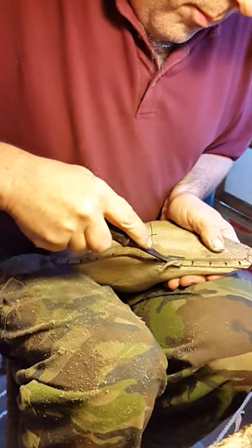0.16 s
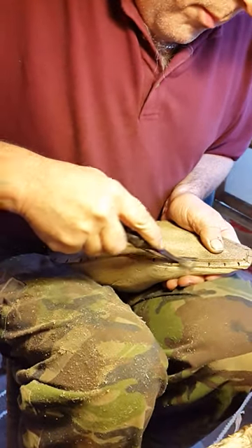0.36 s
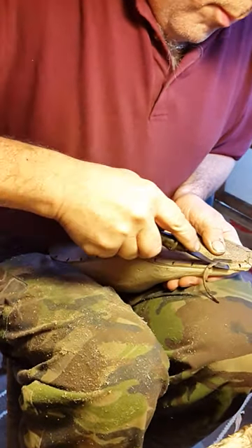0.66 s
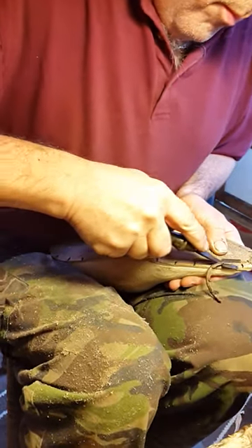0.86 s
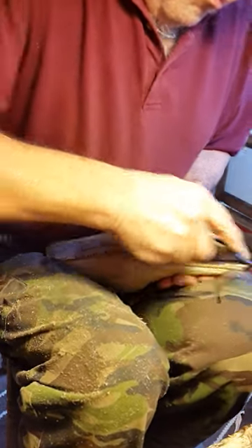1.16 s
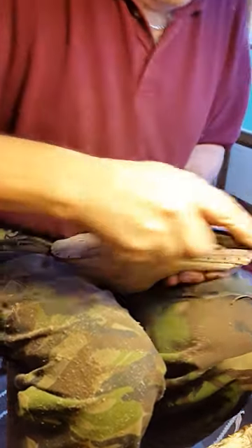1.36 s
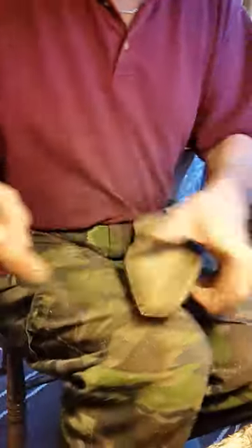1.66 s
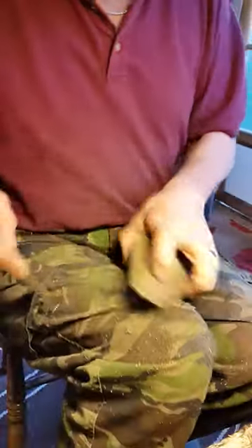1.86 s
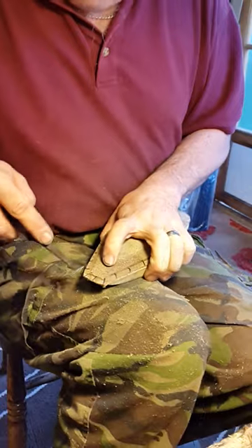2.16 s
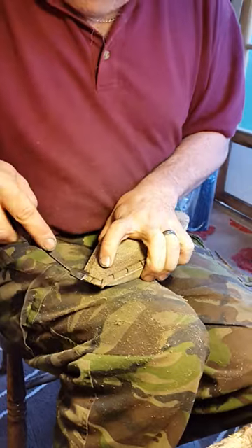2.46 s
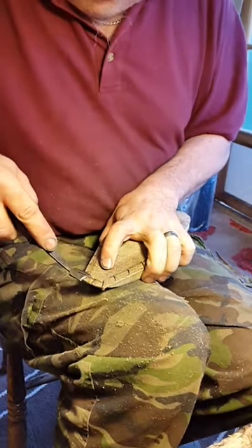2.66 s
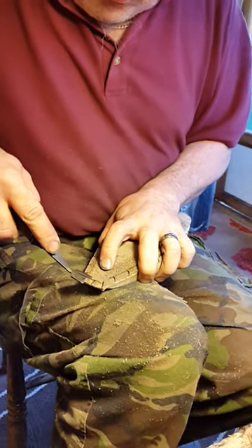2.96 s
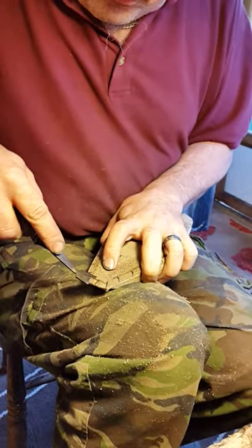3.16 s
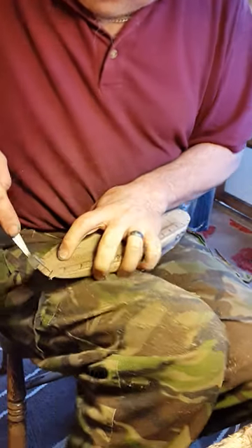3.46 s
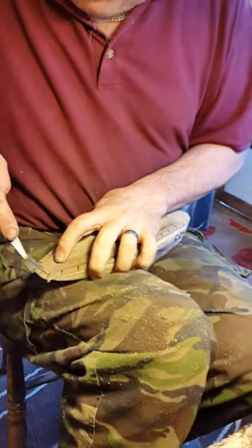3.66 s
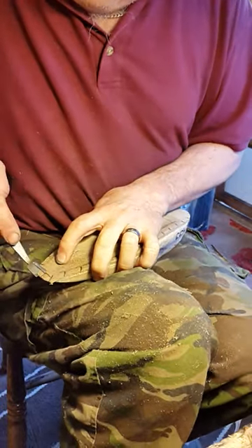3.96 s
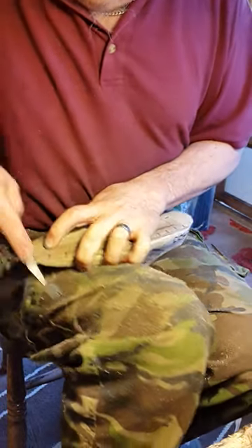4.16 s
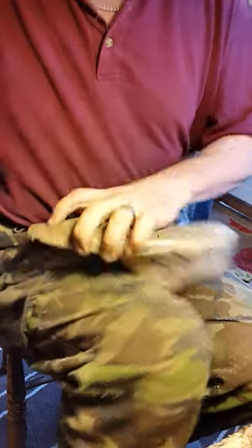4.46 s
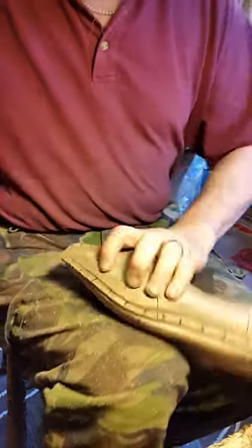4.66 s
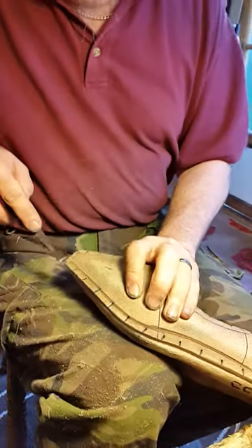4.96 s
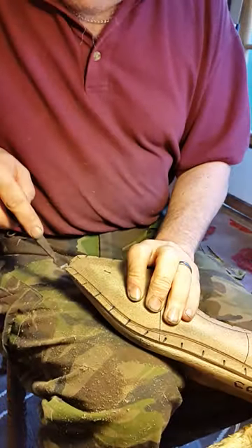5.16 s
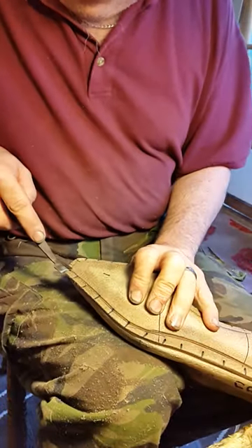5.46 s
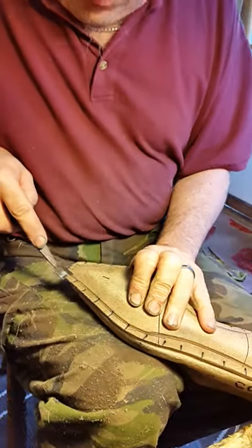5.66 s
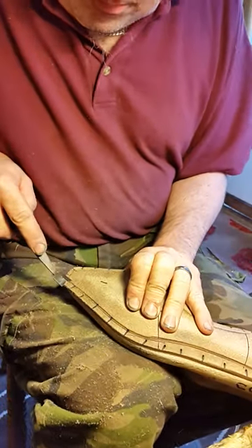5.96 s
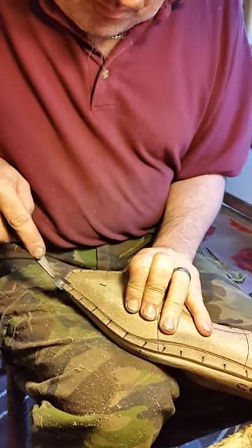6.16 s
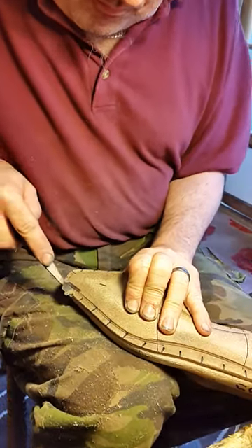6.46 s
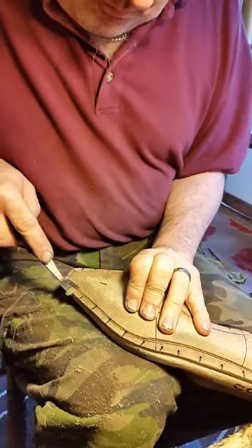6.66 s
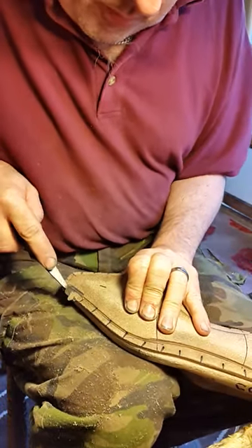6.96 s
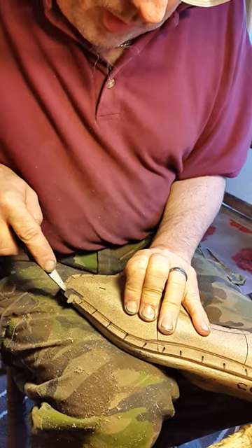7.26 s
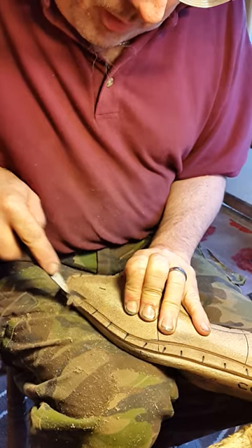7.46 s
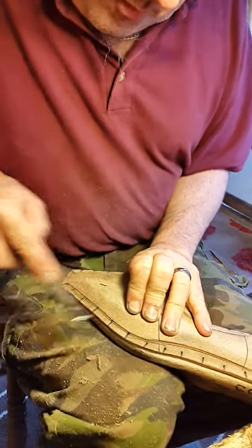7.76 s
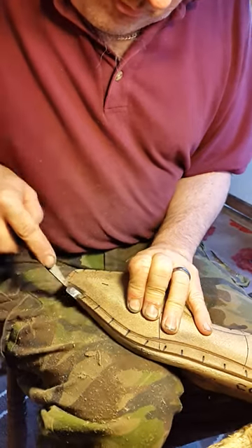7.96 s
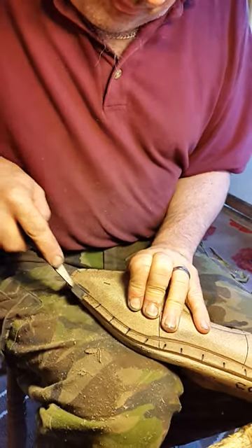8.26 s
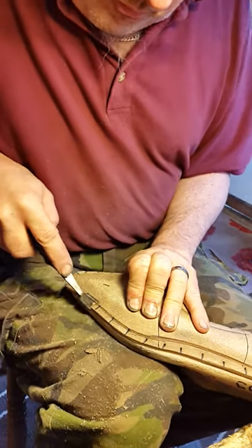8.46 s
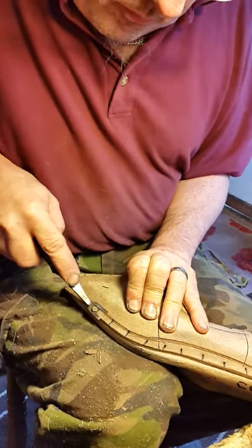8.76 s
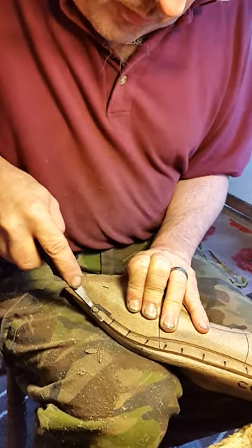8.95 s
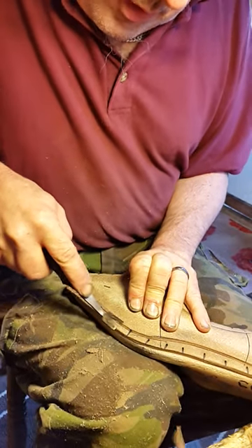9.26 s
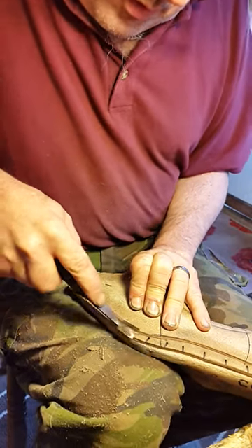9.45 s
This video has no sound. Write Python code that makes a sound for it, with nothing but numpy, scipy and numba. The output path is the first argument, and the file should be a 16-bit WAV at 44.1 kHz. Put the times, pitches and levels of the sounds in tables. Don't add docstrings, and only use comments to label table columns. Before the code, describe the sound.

A quiet room hums low with faint hiss. From 0.1 to 1.3 seconds a knife makes about ten short, light scrapes in leather, each a grainy rasp with a hollow wooden ring near the middle pitches, strongest around 0.55 to 1.25. Cloth and skin rustle from 1.3 to 2.2 with dull small bumps. After near silence, tiny nicks come at 3.0 to 3.3, rustle at 3.4 to 4, and a cluster of crisp nicks at 4 to 4.3. Brisk rustling leads to one loud, deep, dry knock at 5.0; the room noise dips, then recovers. From 6.0 heavier cuts judder and creak woodily, densest at 6.4 to 7.1, with a strong stroke at 7.6 and a bright snap. A softer pause with cloth sliding follows, then resonant strokes at 8.4 to 9.6, lower and fuller. Close stereo pickup, short dull echo.

```python
import sys
import numpy as np
from scipy import signal
from scipy.fft import rfft, irfft, next_fast_len
from scipy.io import wavfile
from scipy.ndimage import uniform_filter1d
from numba import njit

SR = 44100
rng = np.random.default_rng(int(sys.argv[2]) if len(sys.argv) > 2 else 0)


def file_out(sig):
    cols = np.atleast_2d(sig).T
    lim = np.clip(cols, -1, 1)
    pcm = np.round(lim * 32767).astype(np.int16)
    wavfile.write(sys.argv[1], SR, pcm)


def undo_db(level):
    steps = np.asarray(level, float) / 20
    return 10 ** steps


N = 424241
HZ = np.maximum(np.fft.rfftfreq(N, 1 / SR), 1)


def rms_one(x):
    return x / np.sqrt(np.mean(x ** 2) + 1e-20)


def at_hz(points):
    hz, value = np.transpose(points)
    return np.interp(np.log(HZ), np.log(np.maximum(hz, 30)), value)


def colour(x, spectrum):
    return rms_one(irfft(rfft(x) * undo_db(at_hz(spectrum)), N))


def sos_filter(x, order, hz, kind):
    return signal.sosfilt(signal.butter(order, hz, kind, fs=SR, output="sos"), x)


def drift(rate):
    r = np.exp(-2 * np.pi * rate / SR)
    wander = signal.lfilter([1], [1, -2 * r, r * r], rng.standard_normal(N + SR))
    return rms_one(wander[SR:])


def grains(per_s, spread_db, clump_db):
    born = rng.random(N) < per_s / SR
    size_db = spread_db * np.minimum(rng.exponential(1, N), 4) + clump_db * drift(34)
    return rms_one(born * undo_db(size_db) * rng.choice([-1, 1], N))


def landings(rows):
    s, peak_db = np.transpose(rows)
    out = np.zeros(N)
    out[np.round(s * SR).astype(int)] = undo_db(peak_db)
    return out


# time in seconds, wood pitch ratio, blade pitch ratio.
FLEX = [(0.2, 0.95, 1.01), (0.55, 0.98, .99), (0.77, 0.97, 1.02), (1.0, 1.003, .98), (1.27, .99, 1.01),
        (3.5, 1, .99), (4.25, 1.01, 1.01), (6.1, 0.98, .99), (6.45, 1.04, 1.01), (6.85, 1.013, .99),
        (7.1, .99, 1.01), (7.65, 1.01, 0.983), (8.5, 1, 1.1), (8.72, 1.01, 1.01), (8.93, 1.04, 1.01),
        (9.23, 1, .99), (9.55, 0.99, 1.01)]


def flex(column):
    points = np.array(FLEX)
    return np.interp(np.arange(N) / SR, points[:, 0], points[:, column])


@njit
def ring_twice(x, turn, r, ratio):
    out, g = np.zeros_like(x), (1 - r * r) / 2
    for ch in range(x.shape[0]):
        v1 = v2 = c = 0.
        for i in range(2, x.shape[1]):
            if i % 64 == 2:
                c = 2 * r * np.cos(turn * ratio[i])
            v = g * (x[ch, i] - x[ch, i - 2]) + c * v1 - r * r * v2 + 1e-18
            out[ch, i] = g * (v - v2) + c * out[ch, i - 1] - r * r * out[ch, i - 2] + 1e-18
            v1, v2 = v, v1
    return out


def resonate(x, modes, ratio=None):
    out = 0
    ratio = flex(1) if ratio is None else ratio
    for k, (hz, width, level_db) in enumerate(modes):
        r = np.exp(-np.pi * width * 1.55 / SR)
        ringing = ring_twice(np.atleast_2d(x), 2 * np.pi * hz / SR, r, ratio)
        out = out + (-1) ** k * undo_db(level_db) * ringing
    return out.reshape(np.shape(x))


def body(force, modes, per_s, spread_db, clump_db):
    slips = grains(per_s, spread_db, clump_db)
    swell = uniform_filter1d(rms_one(resonate(slips, modes)) ** 2, size=1500)
    slips = slips / (swell + 0.091) ** 0.42
    return resonate(force * slips, modes) / np.std(resonate(slips, modes))


# frequency in Hz, left lead in radians.
HAND_PAN = [(60, -8), (110, -7), (200, -10.5), (380, -11), (700, -1.5), (1290, -8), (2380, 14.5),
            (4400, -5.5), (8120, 16), (15000, 20)]
HAND_TURN = [(0, -7.5), (690, 1.38), (1030, 4), (1980, 4.5), (3900, 14), (16000, 23.5)]
KNEE_PAN = [(60, -16), (110, -4.5), (200, -3), (380, -7), (700, -2.5), (1290, -7), (2380, 14.5), (4400, -4),
            (8120, 11.5), (15000, 16)]
KNEE_TURN = [(0, -0.5), (430, 1.5), (780, 1.46), (1120, 9.5), (1720, 12.5), (2760, 18), (3620, 9.5),
             (4310, 12), (5080, 5.5), (6980, 18), (7920, 8), (8270, 4), (11100, 12), (15700, 8.5)]
KNOCK_PAN = [(100, 1.5), (380, -6), (1290, -5), (2400, 3.5), (8000, 3.5)]
KNOCK_TURN = [(0, 0.51), (520, 0.45), (1380, 3.46), (8000, 17)]


def ports(x, pan, turn):
    half = undo_db(at_hz(pan) / 2) * np.exp(.5j * np.interp(HZ, *np.transpose(turn)))
    pair = irfft(rfft(x) * np.array([half, 1 / half]), N)
    return pair * np.minimum(np.arange(N) / 800, 1)


# time in seconds, level in dB.
ROOM_NOISE = [
    (0, -59),
    (1.5, -59),
    (3, -63.5),
    (4.979, -59.5),
    (5.049, -62.5),
    (5.599, -66.5),
    (6.2, -61),
    (7.4, -60.5),
    (8.2, -61),
    (9.62, -55),
]
# frequency in Hz, level in dB per Hz.
AIR = [(12, -44.5), (20, -8.5), (43, -12), (81, -2), (209, -4), (285, -8), (387, -7), (498, -17.5),
       (757, -25.5), (1060, -20), (1360, -26), (2500, -32), (5830, -40.5), (13900, -43.5), (16000, -37)]
# frequency in Hz, left-right likeness (1 is the same).
AIR_LIKENESS = [(60, 0.97), (240, 1), (950, 0.44), (3770, 0.67), (15000, -1.5)]


def room_noise():
    left_lead_s = .00035
    alike = np.clip(at_hz(AIR_LIKENESS), 0, 1)
    mid, side = rfft(rng.standard_normal((2, N)))
    pair = np.sqrt(1 + alike) * mid + np.sqrt(1 - alike) * side * [[1], [-1]]
    pair[1] *= np.exp(-2j * np.pi * HZ * left_lead_s)
    s, level_db = np.transpose(ROOM_NOISE)
    gain = undo_db(np.interp(np.arange(N) / SR, s, level_db) + drift(rate=0.66) + 4.0)
    balance = undo_db(np.array([[-.8], [.8]]))
    return gain * rms_one(irfft(pair * undo_db(at_hz(AIR)), N)) * balance


def workshop(x):
    t60_s, wall_cut_hz = .3, 2200
    size = next_fast_len(N + SR)
    w = 2 * np.pi * np.fft.rfftfreq(size, 1 / SR)
    lags = rng.uniform(0.01, 0.036, (2, 8, 1))
    wall = undo_db(-60 * lags / t60_s) / (1 + 1j * w / (2 * np.pi * wall_cut_hz))
    loop = wall * np.exp(-1j * w * lags)
    return irfft(rfft(x, size) * (loop / (1 - loop)).sum(axis=1), size)[:, :N]


# start in seconds, length in seconds, level in dB, extra brightness in dB.
RUSTLE = [(0.67, 0.1, -65, 10.5), (0.79, 0.2, -62.5, 10.5), (1.1, 0.17, -78, 5), (1.308, 0.16, -58.5, 13.5),
          (1.501, 0.13, -67, 16.5), (1.593, 0.41, -58.5, 9.5), (1.949, 0.28, -61, 8.5),
          (3.375, .12, -66, 10), (3.456, 0.19, -61, 16.5), (3.583, 0.5, -61, 6), (4.292, 0.23, -60, 2),
          (4.516, 0.09, -52.5, 9.5), (4.594, 0.24, -54, 11.5), (4.783, 0.33, -61.5, 8),
          (5.071, 0.22, -76, 1), (5.366, 0.11, -66, 3.5), (7.766, 0.23, -60.5, 3.5),
          (8.371, 0.26, -57.5, 6.5)]


def slides():
    roundness = 0.89
    out = np.zeros((2, N))
    for start, length, level_db, bright_db in RUSTLE:
        at = np.arange(int(start * SR) + 1, int((start + length) * SR))
        arch = np.abs(np.sin(np.pi * (at / SR - start) / length)) ** roundness
        out[:, at] += undo_db(level_db) * arch * [[1], [undo_db(bright_db) - 1]]
    return out


# frequency in Hz, width in Hz, level in dB.
STIRRED = [(237, 94, -0.5), (398, 43, 8.5), (646, 71, -5), (1103, 99, 6), (1610, 150, 4), (2040, 60, 4),
           (2810, 130, 0.5)]
# frequency in Hz, level in dB per Hz.
CLOTH = [(290, -7.5), (500, -6.5), (830, -11.5), (1130, -4.5), (1280, -9), (3480, -12.5), (4210, -16),
         (13200, -46), (16000, -39.5)]


def rustle():
    level, bright = slides()
    shared = grains(per_s=3200, spread_db=-6.0, clump_db=3.5)
    own = rng.standard_normal((2, N))
    shared = shared + undo_db(6.5) * resonate(shared, STIRRED)
    soft = colour(ports(shared, HAND_PAN, HAND_TURN) + own, CLOTH)
    treble = sos_filter(soft, 2, 5000, "high")
    return undo_db(3.5) * (level * soft + bright * treble)


# time in seconds, peak in dB, rattle in dB
BUMPS = [(1.31, -39.5, -5.5), (1.839, -40, -2.5), (1.919, -46, -5), (2.166, -43.5, -17),
         (3.402, -40.5, -11), (3.415, -44, -30), (3.668, -42, -16), (3.685, -43, -27), (4.988, 3.5, -29),
         (5.0, -16, -10), (5.012, -2, -28), (5.023, -19, -10.5), (5.034, -20.5, -16), (5.045, -28, -18),
         (5.363, -34, -30.5), (5.408, -45, -7), (6.713, -39, -14), (6.776, -36.5, -15.5), (8.088, -48, -66),
         (8.232, -40, -22), (8.311, -59, -13), (9.368, -46.5, 1.5)]
# frequency in Hz, level in dB, t60 in seconds.
STRUCK = [(37.7, -22.5, 0.28), (80, -25.5, 0.27), (150.8, -11.5, .18), (183, -1.5, 0.12), (272, 7.5, 0.031),
          (328.2, -2.5, 0.11), (550, -17, 0.073), (664, -12.5, 0.075)]
# frequency in Hz, width in Hz, level in dB.
RATTLE = [(444, 150, 6), (702, 69, -9), (866, 170, -3), (1163, 160, 2.5), (1650, 170, -10),
          (1796, 280, -23), (2550, 300, -33), (3560, 200, -31.5), (7050, 92, -38.5)]


def bumps():
    contact_lead_s, contact_hz, rattle_t60_s = .003, 470, 0.085
    s, peak_db, rattle_db = np.transpose(BUMPS)
    at, out = np.round(s * SR).astype(int), 0
    chance_db = rng.normal(0, 1, (len(BUMPS), len(STRUCK)))
    for k, (hz, level_db, t60) in enumerate(STRUCK):
        clicks = np.full(N, 1e-18)
        mode_db = peak_db - 8.5 + level_db + chance_db[:, k]
        clicks[at - round(contact_lead_s * SR)] = (-1) ** k * undo_db(mode_db)
        r, w = undo_db(-60 / (t60 * SR)), 2 * np.pi * hz / SR
        out = out + signal.lfilter([0, np.sin(w)], [1, -2 * r * np.cos(w), r * r], clicks)
    thud = sos_filter(out, 4, contact_hz, "low")
    shakes = np.full(N, 1e-18)
    shakes[at] = undo_db(peak_db + rattle_db)
    tap = undo_db(30) * resonate(shakes, RATTLE)
    dying = signal.lfilter([1], [1, -undo_db(-60 / (rattle_t60_s * SR))], shakes)
    return thud + tap + body(dying, RATTLE, per_s=3900, spread_db=-1.5, clump_db=3.5)


# time in seconds, frequency in Hz, peak in dB, rise in seconds, t60 in seconds.
RINGS = [(1.079, 1100, -33, .006, .06), (5.0, 417, -45, .02, .77), (5.001, 7100, -56.5, .003, .06),
         (5.058, 1125, -29, .012, .13), (6.41, 1050, -40, .01, .12), (6.68, 1050, -44, .012, .08),
         (7.035, 150, -27, .01, .35), (7.085, 150, -25, .01, .3), (7.85, 1010, -43, .01, .14),
         (8.232, 400, -39, .004, .07), (8.48, 1030, -47, .01, .15), (8.668, 680, -28, .004, .09),
         (8.906, 690, -29, .004, .25), (9.365, 2650, -44, .0015, .03), (9.366, 5400, -52, .0015, .03)]


def rings():
    out, t = np.zeros(N + SR), np.arange(SR) / SR
    for s, hz, peak_db, rise_s, t60 in RINGS:
        at = round(s * SR)
        envelope = undo_db(peak_db - 60 * t / t60) * (1 - np.exp(-t / rise_s))
        out[at:at + SR] += envelope * np.sin(2 * np.pi * hz * t)
    return out[:N]


# time in seconds, peak in dB,
# lowest frequency in Hz.
TICKS = [(0.149, -46, 4000), (0.4264, -43, 3500), (0.511, -29, 4500), (2.26, -52, 2500),
         (2.7332, -50, 3000), (3.156, -55, 600), (3.296, -56, 600), (3.304, -57, 700), (4.2822, -44, 4000),
         (4.3559, -42, 4500), (7.159, -36, 5000), (7.409, -86, 2500), (7.421, -62, 2500),
         (7.65, -28.5, 3500), (9.1486, -39, 3530), (9.3655, -59, 1500)]


def ticks():
    out, t = np.zeros(N), np.arange(SR // 20) / SR
    for s, peak_db, low_hz in TICKS:
        snap = undo_db(peak_db - 17.5 - 60 * t / 0.024) * rng.standard_normal(len(t))
        at = round(s * SR)
        out[at:at + len(t)] += sos_filter(snap, 2, low_hz, "high")
    return out


BITE_S = [.005, .006, .008, .025, .03]


def strokes(cuts, parts, attack_s):
    out = np.zeros((len(parts), N))
    offset_db, share, bite_db, build_db, release = np.transpose(parts)[:, :, None]
    for start, length, push_db, swell_db, sharp_db in cuts:
        at = np.arange(int((start - attack_s) * SR), min(N, int((start + length + 1) * SR)))
        t = at / SR - start
        level_db = push_db + offset_db + share * sharp_db
        level_db = level_db + (swell_db + build_db) * np.clip(t / length, 0, 1)
        level_db += bite_db * np.exp(-np.abs(t) / np.array(BITE_S)[:, None])
        level_db -= release * np.maximum(t - length, 0)
        out[:, at] += np.clip(1 + t / attack_s, 0, 1) * undo_db(level_db)
    return out


# frequency in Hz, level in dB.
HISS = [(1180, 8), (2000, 3.5), (2200, -0.5), (3550, 0.5), (4570, -5.5), (4980, -4.5), (7960, -16.5),
        (16000, -24.5)]


def fibre_hiss(level, pan, blade, crackle_db):
    dense = grains(per_s=6700, spread_db=0.5, clump_db=4.0)
    cracks = grains(per_s=320, spread_db=2.5, clump_db=3.0)
    own = rng.standard_normal((2, N))
    snaps = ports(dense + undo_db(crackle_db) * cracks, pan, KNEE_TURN) + ports(1.33 * own, pan, KNEE_TURN)
    wobble = rms_one(uniform_filter1d(uniform_filter1d(own[0], size=3000), size=3000))
    blade_ratio = flex(2) + .007 * wobble
    hiss = colour(snaps + resonate(snaps, blade, blade_ratio), HISS)
    return level * sos_filter(hiss, 2, 500, "high")


# start in seconds, length in seconds, push in dB,
# swell over the cut in dB, sharpness in dB.
NICKS = [(3.034, 0.014, -65.5, -11, 13.5), (3.153, 0.0055, -64.5, -1, 9), (3.29, 0.02, -61, -4, 10),
         (3.965, 0.01, -59.5, 6, 12.5), (3.983, 0.0067, -60, -3.5, 8), (4.04, 0.014, -52, -9.5, 8.5),
         (4.18, 0.042, -47, -17, 17), (4.23, 0.03, -49.5, 3, 14.5), (4.279, 0.012, -43.5, -5.5, 9),
         (4.3, 0.0087, -52, -7, 0.5), (4.322, 0.014, -60, -5.5, 11.5)]
NICK_ATTACK_S = 0.0024
# level in dB from the push, share of the sharpness,
# first bite in dB, build-up in dB, release in dB per second.
HAND_PARTS = [
    (-0.5, 0.045, 2, 2, 911),
    (-21.5, 0.085, -3, -5.5, 202),
    (-18.5, 1.55, 7, 3, 708),
    (-14, 0.87, -15.5, -3.5, 610),
    (-29, 0.66, 2.5, -2.5, 67),
]
# frequency in Hz, width in Hz, level in dB.
NICK_UPPER = [(1657, 120, 2.5), (2004, 63, -6.5), (2765, 135, -2), (3350, 110, -14), (3840, 240, -8.5),
              (4700, 200, -25)]


def nicks():
    upper = strokes(NICKS, HAND_PARTS, NICK_ATTACK_S)[2]
    return undo_db(-3.0) * body(upper, NICK_UPPER, per_s=3000, spread_db=4.5, clump_db=4.0)


# start in seconds, length in seconds, push in dB,
# swell over the cut in dB, sharpness in dB.
HAND_CUTS = [(0.112, 0.048, -60, -3, -3.5), (0.239, 0.046, -53, -9, 0), (0.3, 0.046, -58.5, 8.5, -2.5),
             (0.385, 0.099, -56.5, 11, -4.5), (0.508, 0.027, -48.5, 8, 5.5), (0.553, 0.13, -43.5, -9, 5),
             (0.748, 0.038, -45.5, 1, 4.5), (0.933, 0.089, -46, -8, 1), (1.033, 0.057, -48.5, 2.5, 3.5),
             (1.235, 0.042, -43.5, -2, 5), (1.314, 0.031, -58.5, -2, 10.5)]
# frequency in Hz, width in Hz, level in dB.
HAND_BODY = [(230, 87, -1.5), (401.4, 35.4, 9), (654, 72, 4), (846, 160, -9), (1107, 87, 6.5)]
HAND_UPPER = [(1250, 76, 4), (1435, 50, 8), (1560, 42, 2.5), (1780, 63, -11), (2080, 46, 0), (2540, 80, -5),
              (2890, 79, .5), (3460, 99, -7), (3990, 200, -4)]
HAND_BLADE = [(3010, 120, 1), (3194, 100, -8), (3576, 100, 3), (4600, 140, 1.5), (5170, 110, -4.5),
              (5700, 180, -4.5), (6470, 240, 1), (7230, 270, 2), (8000, 300, 2), (8550, 150, -3),
              (9000, 290, 3)]


def hand_cuts():
    push, settle, upper, tear, drag = strokes(HAND_CUTS, HAND_PARTS, attack_s=0.0074)
    point = strokes(NICKS, HAND_PARTS, NICK_ATTACK_S)
    push = push + settle + point[0] + point[1]
    hiss = tear + drag + undo_db(-3.5) * (point[3] + point[4])
    wood = undo_db(2.5) * body(push, HAND_BODY, per_s=2500, spread_db=5.5, clump_db=0.0)
    wood += undo_db(-1.0) * body(upper, HAND_UPPER, per_s=3400, spread_db=7.0, clump_db=1.5)
    return wood, undo_db(13.5) * fibre_hiss(hiss, HAND_PAN, HAND_BLADE, crackle_db=-0.5)


# start in seconds, length in seconds, push in dB,
# swell over the cut in dB, sharpness in dB.
KNEE_CUTS = [(6.021, 0.024, -36, -18.5, -5), (6.124, 0.017, -37.5, 5.5, 1.5), (6.377, 0.064, -31.5, 1, 3),
             (6.417, 0.121, -29, 5, -4), (6.509, 0.023, -40, -0.5, 1), (6.644, 0.042, -45, 5.5, 3),
             (6.823, 0.037, -28.5, 7, -8), (6.959, 0.0027, -42.5, 2, 8.5), (7.031, 0.062, -25.5, -9, -1),
             (7.084, 0.056, -22, -8, -7), (7.408, 0.0036, -49, -3, 21), (7.42, 0.005, -49.5, -2, 17.5),
             (7.603, 0.037, -17.5, -8, 1), (7.644, 0.06, -38, -18, 23.5), (7.719, 0.093, -36.5, -16.5, -13),
             (7.835, 0.16, -45, -5.5, -6), (8.375, 0.19, -50.5, 16, -24), (8.56, 0.1, -42.5, 11, 1.5),
             (8.671, 0.077, -28.5, 5, 1), (8.876, 0.062, -29.5, -0.5, 5), (8.906, 0.089, -25.5, 2, -6.5),
             (9.163, 0.055, -20.5, -12, 4.5), (9.214, 0.081, -23, -2, 1), (9.363, 0.011, -43, -17, 19),
             (9.461, 0.031, -31, 6.5, 3.5), (9.486, 0.18, -29, 2.5, -1)]
# level in dB from the push, share of the sharpness,
# first bite in dB, build-up in dB, release in dB per second.
KNEE_PARTS = [
    (-6.5, 0.069, 7, 0.33, 700),
    (-17, 0.055, -7, 0.37, 145),
    (-11, 0.29, -4.5, 0.45, 940),
    (-43.5, 1.55, -19, 0.8, 930),
    (-54, 1.03, -10, 0.37, 44.7),
]
# time in seconds, peak in dB.
SLIPS = [(6.02, -28.5), (6.14, -38), (6.14, -25), (6.186, -50), (6.216, -56), (6.266, -39), (6.312, -60),
         (6.386, -14.5), (6.423, -14), (6.514, -7), (6.515, -15), (6.538, -9.5), (6.644, -23), (6.705, -31),
         (6.772, -33.5), (6.845, -9), (6.845, -18), (6.959, -31), (7.046, -22), (7.085, -18.5),
         (7.114, -10), (7.404, -77), (7.406, -50), (7.477, -53), (7.496, -47), (7.521, -41.5), (7.605, -16),
         (7.605, -16), (7.786, -33.5), (7.838, -33), (7.878, -44), (7.964, -70), (8.043, -64), (8.09, -42),
         (8.231, -49), (8.231, -43), (8.311, -43), (8.364, -46), (8.364, -48), (8.423, -39), (8.423, -43),
         (8.507, -33), (8.522, -40), (8.535, -32), (8.596, -21.5), (8.667, -25), (8.701, -22), (8.904, -30),
         (8.905, -32), (8.905, -15.5), (8.969, -16.5), (9.162, -25), (9.213, -15), (9.286, -12.5),
         (9.362, -36), (9.46, -19), (9.524, -11), (9.569, -24)]
# time in seconds, peak in dB.
CATCHES = [(6.144, -25), (6.376, -27), (6.398, -32), (6.831, -20.5), (7.038, -21), (7.608, -36),
           (8.673, -35), (8.88, -24), (8.91, -22), (9.164, -24), (9.216, -21), (9.366, -40), (9.486, -26)]
# frequency in Hz, width in Hz, level in dB.
TIP_LOW = [(96.3, 10, -4.5), (143.5, 27, -3), (197, 80, -1), (255.6, 51.4, -3.5), (339.6, 28, -10)]
TIP_HIGH = [(425.3, 30.5, 8), (515, 37, -5.5), (647, 55, 2.5), (814, 75, -5), (1072, 110, -3.5),
            (1456, 25, -13.5), (1574, 74, -14), (2020, 32, -21), (2620, 1100, -28.5), (3410, 230, -39)]
KNEE_LOW = [(92, 24, -4), (141, 28, 1), (201.6, 69, 3), (280, 52, -2), (326, 127, -9.5)]
KNEE_HIGH = [(400, 15.8, 7.5), (461, 46, 4), (654, 48.4, 10), (855, 100, -2), (1071, 45, -1.5),
             (1250, 160, -15.5), (1965, 57, -14), (2270, 300, -22), (2683, 34, -16.5), (3330, 77, -28),
             (3770, 100, -33), (4180, 250, -41)]
KNEE_BLADE = [(3670, 120, 3.5), (4650, 130, -2), (4970, 64, -1.5), (6000, 180, -10), (6030, 106, -13),
              (7200, 400, -19), (8160, 510, -2)]


def knee_cuts():
    low, settle, high, tear, drag = strokes(KNEE_CUTS, KNEE_PARTS, attack_s=0.003)
    low = low + settle
    tip = np.arange(N) < 8.0 * SR
    wood = 0
    for here, low_modes, high_modes in ((tip, TIP_LOW, TIP_HIGH), (~tip, KNEE_LOW, KNEE_HIGH)):
        wood = wood + body(here * low, low_modes, per_s=820, spread_db=2.0, clump_db=0.0)
        wood = wood + undo_db(2.0) * body(here * high, high_modes, per_s=2500, spread_db=6.0, clump_db=3.0)
        edge = here * landings(SLIPS)
        catch = here * landings(CATCHES)
        wood = wood + undo_db(36) * resonate(edge, low_modes)
        wood = wood + resonate(undo_db(17) * edge + undo_db(24.5) * catch, high_modes)
    return wood, undo_db(20.0) * fibre_hiss(tear + drag, KNEE_PAN, KNEE_BLADE, crackle_db=-4.0)


def scene():
    hand, hand_hiss = hand_cuts()
    knee, knee_hiss = knee_cuts()
    knee = knee + ticks()
    knock = bumps() + rings()
    work = ports(hand, HAND_PAN, HAND_TURN)
    work += ports(knee, KNEE_PAN, KNEE_TURN)
    work += ports(knock, KNOCK_PAN, KNOCK_TURN)
    work += undo_db(-27.5) * workshop(hand + knee + knock)
    work = sos_filter(work, 2, 89, "high")
    work += hand_hiss + knee_hiss + rustle() + room_noise()
    return work + ports(nicks(), HAND_PAN, HAND_TURN)


def low_pass(x):
    return signal.sosfilt(signal.butter(12, 16100, fs=SR, output="sos"), x)


def record(dry):
    capped = np.clip(dry, -.9, .9)
    mix = signal.sosfilt(signal.cheby2(12, 50, 16050, fs=SR, output="sos"), capped)
    return low_pass(mix)


dry = scene()
out = record(dry)
file_out(out)
```